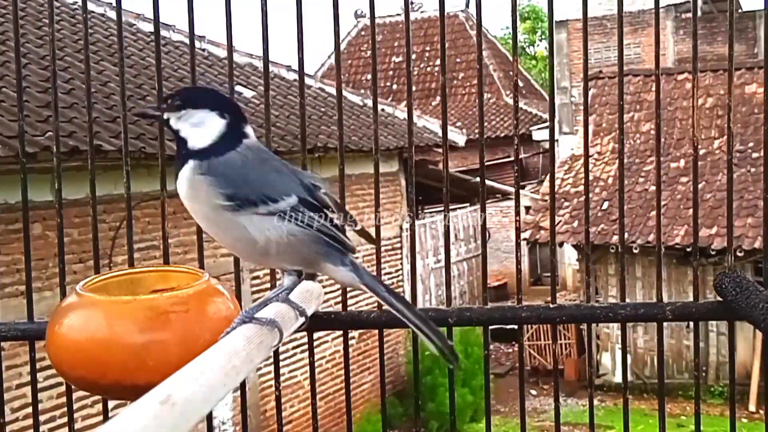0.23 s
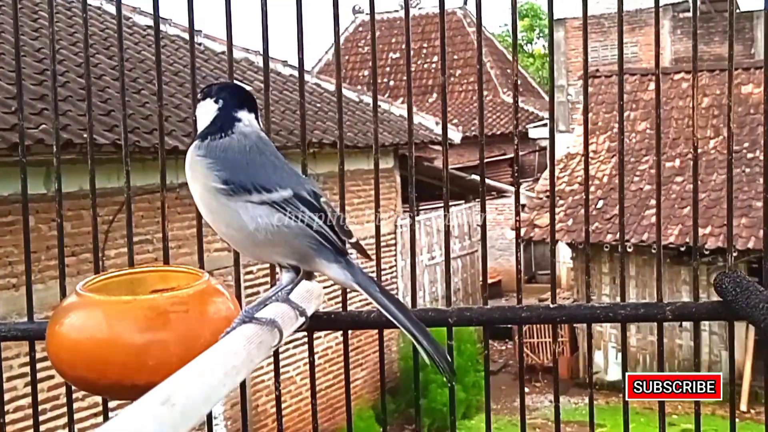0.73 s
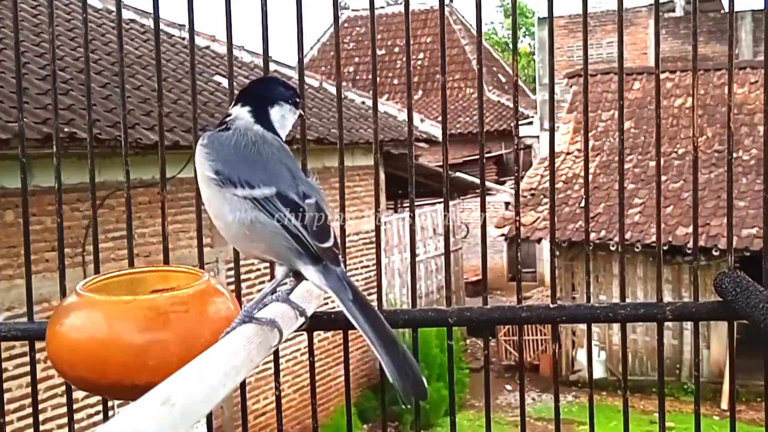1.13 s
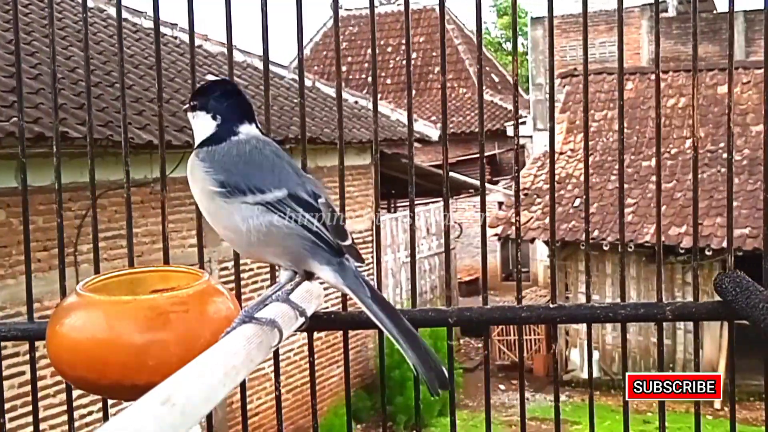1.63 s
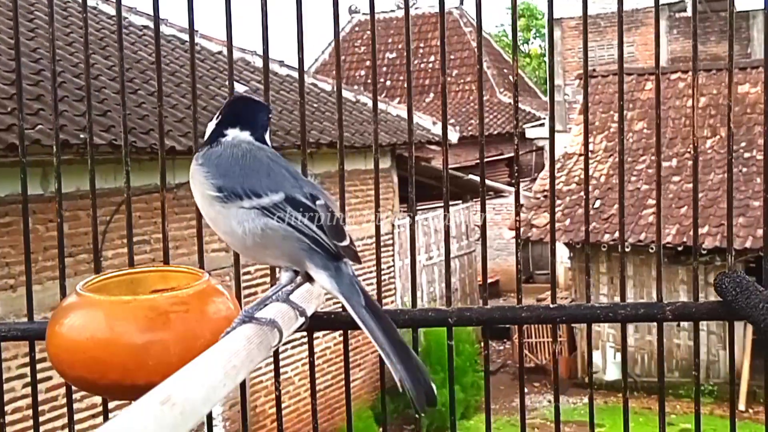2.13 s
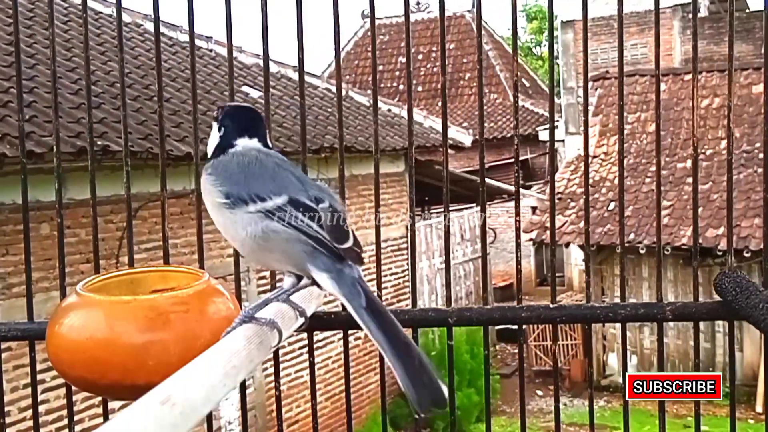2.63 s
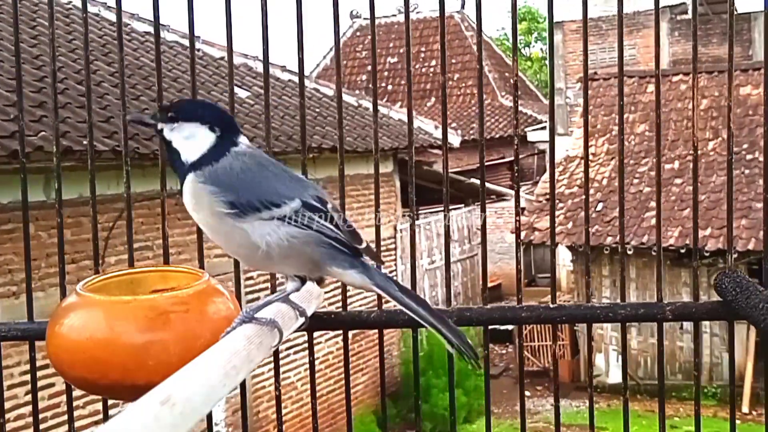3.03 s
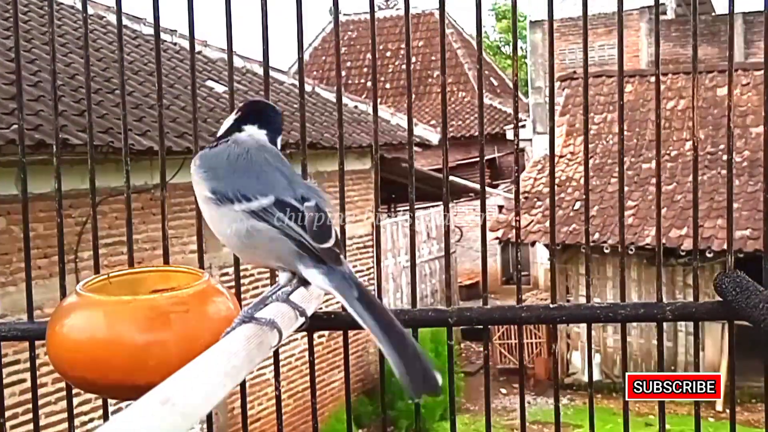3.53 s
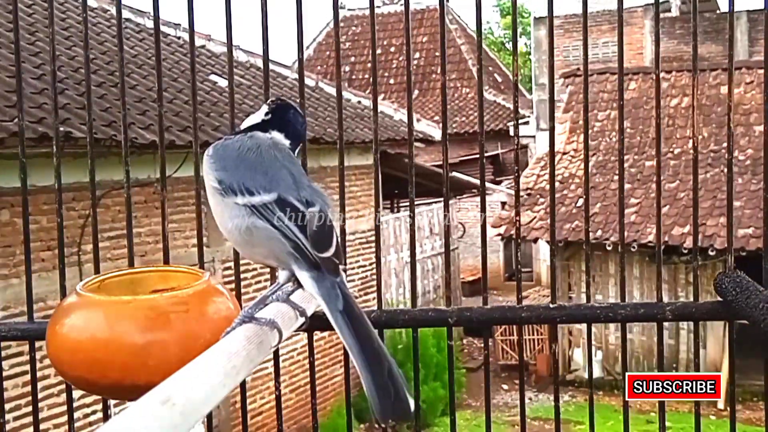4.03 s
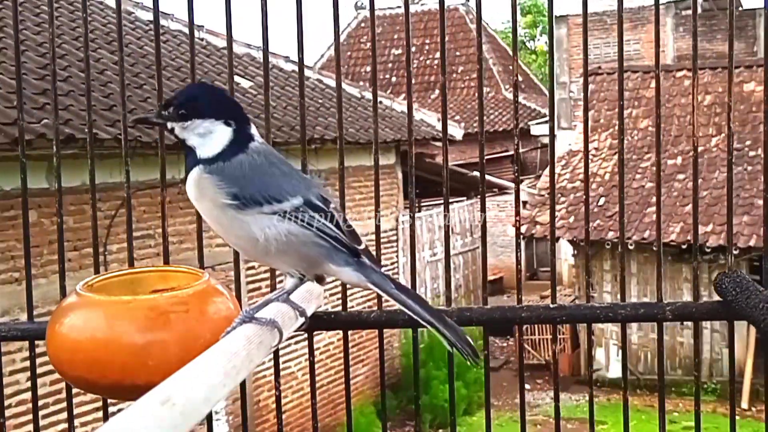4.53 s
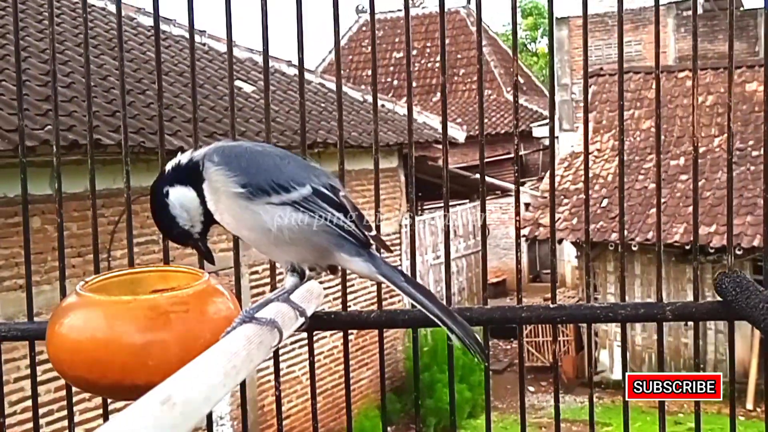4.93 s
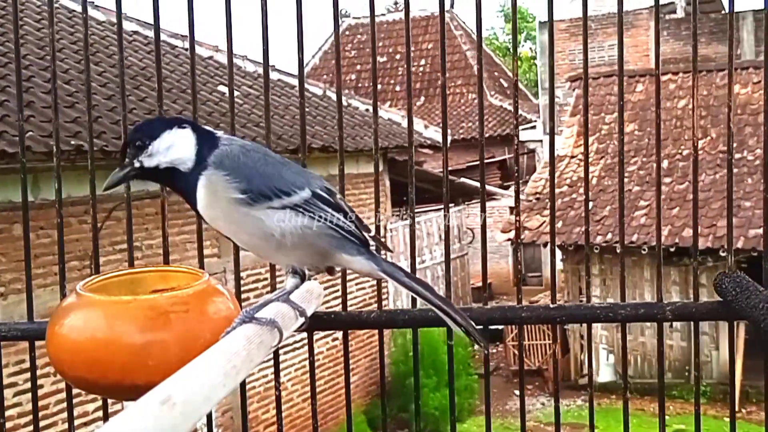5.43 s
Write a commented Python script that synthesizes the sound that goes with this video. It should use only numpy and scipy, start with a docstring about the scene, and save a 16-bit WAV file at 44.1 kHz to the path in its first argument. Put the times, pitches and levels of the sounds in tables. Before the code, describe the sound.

A small engine chugs with a quick, hollow beat and recedes among houses. Close up and much louder, a small bird whistles a bright, rising three-note pattern five times in a row, with a slight echo from the yard walls. The song ends, leaving a soft outdoor background with far-off chirps, a barely audible insect and some dull knocks and light rubbing.

```python
"""A caged tit, close up, sings five quick phrases of three arched whistles: low, middle, high.
Each is a gliding tone with weak overtones; the cage bars scatter it and the yard walls answer.
Before the song, a one-cylinder engine putters, each puff ringing its pipe, and fades among the houses.
Far birds and an insect call faintly over the village hush, with a few soft bumps and scuffs."""
import sys
import numpy as np
from scipy import signal
from scipy.fft import rfft, irfft, next_fast_len
from scipy.io import wavfile
from scipy.ndimage import uniform_filter1d, minimum_filter1d, map_coordinates

SR = 44100
rng = np.random.default_rng(int(sys.argv[2]) if len(sys.argv) > 2 else 0)


def wav_out(sig):
    """Save sig, one row per channel (or a flat mono array), as 16-bit PCM at SR to the path in sys.argv[1]."""
    wavfile.write(sys.argv[1], SR, np.round(np.clip(np.atleast_2d(sig).T, -1, 1) * 32767).astype(np.int16))


N = 250488
TIME = np.arange(N) / SR


def amp(db):
    """Decibels to gain."""
    return 10 ** (np.asarray(db) / 20)


def unit(x):
    """Scale to rms 1."""
    return x / np.sqrt(np.mean(x ** 2) + 1e-20)


def along(points, hz):
    """Read (Hz, value) points on a log axis."""
    f, v = np.transpose(points)
    return np.interp(np.log(hz + 1), np.log(f + 1), v)


def curve(rows):
    """Read (seconds, value) points at every sample."""
    return np.interp(TIME, *np.transpose(rows))


def wobble(rate):
    """A smooth random curve with rate knots a second."""
    return map_coordinates(rng.standard_normal(int(N * rate / SR) + 4), [TIME * rate])


def filtered(x, response):
    """Apply a complex frequency response."""
    m = next_fast_len(N + SR // 2)
    return irfft(rfft(x, m) * response(np.fft.rfftfreq(m, 1 / SR)), m)[:N]


def resonance(f, hz, width):
    """Causal band-pass with a peak gain of 1."""
    return 1j * f * width / (hz * hz - f * f + 1j * f * width)


def noise(spectrum):
    """Coloured noise of rms 1."""
    return unit(filtered(rng.standard_normal(N), lambda f: amp(along(spectrum, f))))


def band_noise(hz, width):
    """Noise of rms 1 around one frequency."""
    return unit(filtered(rng.standard_normal(N), lambda f: resonance(f, hz, width) ** 2))


def gate(start, end, edge):
    """1 between start and end, with smooth edges."""
    return np.sin(np.pi / 2 * np.clip(np.minimum(TIME - start, end - TIME) / edge + .5, 0, 1)) ** 2


# Colour of the background bed. Each row: frequency in Hz, relative level in dB.
HUSH_SPECTRUM = [(18, -43.5), (30, -12.5), (98, -1.5), (226, -8), (294, -10.5), (353, 5.5), (424, -12.5),
                 (566, -15.5), (645, -10.5), (2950, -20.5), (3360, -21), (4490, -28), (7010, -27),
                 (11800, -46), (15800, -37.5)]

def village_hush(patchy_db=4.0, level_db=-58):
    """The hush of the village swells and ebbs in small patches of time and frequency."""
    spectrogram = signal.stft(noise(HUSH_SPECTRUM), nperseg=1024)[2]
    patches = uniform_filter1d(rng.standard_normal(spectrogram.shape), size=3, axis=0)
    patches = unit(uniform_filter1d(patches, size=8, axis=1))
    hush = signal.istft(spectrogram * amp(patchy_db * patches), nperseg=1024)[1][:N]
    return amp(level_db) * unit(hush)


# The yard's reverb. Each row: frequency in Hz, seconds to die away by 60 dB.
YARD_DECAY = [(300, 0.53), (4000, 0.22), (6000, 0.41), (8000, 0.29), (14000, 0.15)]

def yard(x, build_s=0.018):
    """The walls answer with a diffuse tail of unit energy."""
    hz, t, spectrogram = signal.stft(rng.standard_normal(SR // 2), SR, nperseg=256)
    decay = amp(-60 * t / along(YARD_DECAY, hz)[:, None])
    tail = signal.istft(spectrogram * decay, SR, nperseg=256)[1]
    tail *= 1 - np.exp(-(np.arange(len(tail)) / SR / build_s) ** 2)
    return signal.fftconvolve(x, tail / np.linalg.norm(tail))[:N]


# Fade of the engine's wash as it leaves. Each row: time in seconds, level in dB before the layer trims.
WASH_FADE = [(0.0, -41.5), (0.57, -43.5), (0.74, -41), (1.47, -49), (4.71, -60.5), (5.31, -63.5),
             (5.68, -64.5)]
# Colours of its low and high layers. Each row: frequency in Hz, relative level in dB.
DRONE_SPECTRUM = [(29, -29), (50, -13), (123, -11), (161, -3), (205, -3.5), (243, 0), (285, -9.5), (358, 4),
                  (420, -13.5), (486, -2.5), (555, -13), (625, -10), (705, -19), (774, -10.5),
                  (1200, -35.5), (1560, -56), (2640, -120)]
RATTLE_SPECTRUM = [(590, -25), (1000, -7), (1110, 0), (1920, -9), (2140, -3), (2310, -9), (3400, -9.5),
                   (3950, -16), (5630, -15.5), (6270, -11.5), (8650, -30), (13000, -44.5)]

def engine_wash(drone_db=-1.5, rattle_db=-17.5, rattle_fade=1.35):
    """Drone and rattle blur among the houses; distance takes the treble first."""
    wash_db = curve(WASH_FADE)
    peak_db = wash_db.max()
    drone = amp(wash_db + drone_db) * noise(DRONE_SPECTRUM)
    rattle = amp(peak_db + rattle_db + rattle_fade * (wash_db - peak_db)) * noise(RATTLE_SPECTRUM)
    return amp(3.6 * wobble(23)) * (drone + rattle)


# Two even runs of firing, a stumble between them. Each row: start and end in seconds.
FIRING_RUNS = [(.014, 1.0), (1.065, 1.62)]
# Strength of the exhaust. Each row: time in seconds, relative thump and bark levels in dB.
EXHAUST_LEVELS = [(0, -32, -37.5), (.42, -28, -43), (.53, -25.5, -40), (.63, -35.5, -41), (.74, -31, -35.5),
                  (1.0, -37.5, -36), (1.17, -36, -41), (1.28, -50, -52), (1.6, -51, -58)]
# Ring of the exhaust pipe. Each row: frequency in Hz, width in Hz, relative level in dB.
PIPE_MODES = [(165.6, 34, -14.5), (232.5, 4.6, -1), (367.5, 87, 5.5), (533, 50, 4), (720, 34, -48)]
# Colours of exhaust bark and valve tick. Each row: frequency in Hz, relative level in dB.
BARK_SPECTRUM = [(400, -16.5), (700, 1.5), (1150, -5.5), (1600, -10), (2150, -16.5), (3200, -22.5),
                 (4300, -31), (6000, -28), (9000, -46), (14000, -60)]
TICK_SPECTRUM = [(3500, -6.5), (5400, -17), (6400, 2.5), (7400, -12.5), (8500, -17), (11000, -25),
                 (15000, -32)]

def engine_beats(firing_hz=9.72, slap_s=0.0081, slap_loss_db=-0.7, bark_loss_db=-2, pop_s=0.0025,
                 tick_s=0.015, thump_db=37, bark_db=1.0, tick_db=-24, echo_db=-11, wet_db=-13):
    """Each puff of gas rings the pipe and slaps between close walls; the valves clatter just after."""
    puffs, bark_power, ticks = np.zeros((3, N))
    t = np.arange(SR // 10) / SR
    pop = np.exp(-t / pop_s) * (1 - np.exp(-t / 0.001)) ** 2
    tick = t / tick_s * np.exp(1 - t / tick_s)
    firings = np.concatenate([np.arange(start, end, 1 / firing_hz) for start, end in FIRING_RUNS])
    when, *levels = np.transpose(EXHAUST_LEVELS)
    for start in firings:
        puff_db, pop_db = (np.interp(start, when, level) for level in levels)
        for bounce, (late, louder) in enumerate(rng.standard_normal(size=(4, 2))):
            at = round((start + bounce * slap_s + min(bounce, 1) * 0.00058 * late) * SR)
            loss_db = bounce * slap_loss_db + 0.58 * louder
            puffs[at] += amp(puff_db + loss_db + thump_db)
            # the bark fades faster, so each bounce is duller
            bark_power[at:at + len(t)] += amp(pop_db + loss_db + bounce * bark_loss_db) ** 2 * pop
        ticks[round(start * SR):][:len(t)] += amp((pop_db + puff_db) / 2) * tick
    modes = lambda f: sum((-1) ** k * amp(db) * resonance(f, hz, width)
                          for k, (hz, width, db) in enumerate(PIPE_MODES))
    thumps = filtered(puffs, lambda f: modes(f) / (1 + 1j * f / 1100) ** 2)
    bark = amp(bark_db) * np.sqrt(bark_power) * noise(BARK_SPECTRUM)
    valves = amp(tick_db) * ticks * noise(TICK_SPECTRUM)
    beats = thumps + bark + valves
    echo = amp(echo_db) * np.interp(TIME - .06, TIME, thumps)  # off a farther house
    return beats + echo + amp(wet_db) * yard(beats)


# Soft bumps. Each row: start in seconds, envelope peak in dB, pitch in Hz.
BUMP_HITS = [(0.344, -36.5, 90), (.431, -42, 85), (.546, -32, 141), (0.569, -36, 85), (4.222, -43.5, 85),
             (4.558, -47, 118), (4.67, -44.5, 79.4), (4.823, -36.5, 92)]

def bumps(rise_s=0.0091):
    """Dull knocks, each a low tone that dies within a few cycles."""
    out = np.zeros(N)
    for start, db, hz in BUMP_HITS:
        t = np.maximum(TIME - start, 0)
        envelope = (t / rise_s) ** 2 * np.exp(2 - 2 * t / rise_s)
        out += amp(db) * envelope * np.sin(2 * np.pi * hz * t)
    return out


# Insect trills. Each row: start and end in seconds, level in dB.
INSECT_TRILLS = [(.66, 1.07, -76), (4.283, 4.667, -76), (5.27, 5.681, -78.5)]

def insect(buzz_hz=8100, width_hz=450, whine_hz=13680, drift_hz=50, whine_db=-83.5, swell_db=2.5):
    """A narrow buzz in short trills, and a thin whine that comes and goes above it."""
    trills = sum(amp(db) * gate(start, end, .03) for start, end, db in INSECT_TRILLS)
    buzz = trills * band_noise(buzz_hz, width_hz)
    pitch = whine_hz + drift_hz * (wobble(2) + wobble(300))
    swell = amp(whine_db + swell_db * (wobble(3) + wobble(12)))
    return buzz + swell * np.sin(2 * np.pi * np.cumsum(pitch) / SR)


# Distant calls. Each row: start and length in seconds, first and last pitch in Hz, relative level in dB.
FAR_BIRD_CALLS = [(1.355, 0.075, 2700, 2660, -68), (1.551, 0.087, 2550, 2380, -63.5),
                  (3.903, 0.052, 3500, 3380, -67), (4.248, 0.065, 3306, 3270, -65.5),
                  (4.458, 0.067, 3448, 3320, -67.5), (5.35, .12, 3380, 3420, -67),
                  (5.41, 0.095, 1750, 2157, -57), (5.642, 0.057, 1984, 2125, -56)]

def far_birds(waver=0.018, direct_db=-3, wet_db=-6):
    """Faint gliding calls, blurred by distance."""
    calls = np.zeros(N)
    unsteady = 1 + waver * wobble(400)
    for start, length, first_hz, last_hz, db in FAR_BIRD_CALLS:
        pitch = np.interp(TIME, [start, start + length], [first_hz, last_hz]) * unsteady
        calls += amp(db) * gate(start, start + length, .025) * np.sin(2 * np.pi * np.cumsum(pitch) / SR)
    return amp(direct_db) * calls + amp(wet_db) * yard(calls)


def cage(x, decay_s=0.0044):
    """The bars scatter a short, dense flurry of reflections, of unit energy."""
    t = np.arange(SR // 16) / SR
    flurry = rng.standard_normal(len(t)) * t / decay_s * np.exp(-t / decay_s)
    return signal.fftconvolve(x, flurry / np.linalg.norm(flurry))[:N]


# Breath through the open beak, then the overtones' EQ. Each row: frequency in Hz, relative level in dB.
BREATH_SPECTRUM = [(6000, -39), (10000, -2.5), (12000, 0), (14000, -6.5), (15500, -14)]
BEAK_EQ = [(7000, 1.5), (8200, -3.5), (9200, -6.5), (10000, 0.5), (11500, -11), (12800, -5), (13700, -2.5),
           (14700, 6), (15300, -2), (15560, -15.5)]
# The beak beams the overtones at or past the listener. Each row: time in seconds, gain in dB.
BEAK_AIM = [(1.8, 7.5), (2.15, 8.5), (2.5, 1.5), (2.9, -3.5), (3.4, -3.5), (3.7, -4.5), (4.1, -6)]
# Notches where near reflections cancel. Each row: frequency in Hz, width in Hz, depth in dB.
REFLECTION_NOTCHES = [(3890, 270, -5.5), (4326, 180, -16.5), (5460, 160, -6.5), (5910, 250, -15.5),
                      (7700, 260, -2.5)]

def whistles(arch, notes, level_db, second_db, step_db, rasp_db, rasp_hz, wet_db, hiss_db,
             edge_s=.004, jitter=.0015, shimmer_db=1.8, drive=.2, overtone_rasp=0.084, cage_db=-13):
    """A pure tone rides up and down its arch, with weak overtones and a trace of rasp and hiss."""
    place, arch_hz, arch_db = np.transpose(arch)
    pitch, envelope = np.full(N, arch_hz[0]), np.zeros(N)
    for start, length, ratio, note_db in notes:
        end = start + length
        on = (TIME > start - 2 * edge_s) & (TIME < end + 2 * edge_s)
        progress = (TIME[on] - start) / length
        pitch[on] = ratio * np.interp(progress, place, arch_hz)
        contour_db = np.interp(progress, place, arch_db) + note_db + level_db
        envelope[on] = amp(contour_db) * gate(start, end, edge_s)[on]
    pitch = uniform_filter1d(pitch, size=90)  # muscles round the corners of the glide
    phase = 2 * np.pi * np.cumsum(pitch * (1 + jitter * wobble(640))) / SR
    envelope *= amp(shimmer_db * wobble(250))
    tone = envelope * np.sin(phase)
    sidebands = amp(rasp_db) * wobble(2 * rasp_hz) * tone
    # the rasp lies mostly above the note's lowest pitch
    rasp = filtered(sidebands, lambda f: 1 / (1 + (arch_hz[0] / (f + 1)) ** 10))
    # overtones grow faster than the tone itself, and are rougher
    strain = envelope * (envelope / envelope.max()) ** drive
    roughness = amp(1.9 * wobble(150)) * (1 + overtone_rasp * wobble(2 * rasp_hz))
    harmonics = sum(amp(second_db + (k - 2) * step_db) * np.sin(k * phase) * (k * pitch < SR / 2)
                    for k in range(2, 5))
    breath = amp(hiss_db) * noise(BREATH_SPECTRUM)
    overtones = filtered(strain * roughness * (harmonics + breath), lambda f: amp(along(BEAK_EQ, f)))
    overtones += amp(cage_db) * cage(overtones)  # thin bars scatter the shortest waves most
    # the level dips each time the pitch sweeps through a notch
    notches = lambda f: np.prod([1 - (1 - amp(db)) * resonance(f, hz, width)
                                 for hz, width, db in REFLECTION_NOTCHES], axis=0)
    direct = filtered(tone + rasp + amp(curve(BEAK_AIM)) * overtones, notches)
    return direct + amp(wet_db) * yard(tone + amp(0.5) * overtones)


# Each whistle's arch. Each row: place in the note from 0 to 1, base pitch in Hz, relative level in dB.
LOW_GLIDE = [(0, 3340, -34), (.16, 3520, -25), (.345, 3740, -16), (.47, 4080, -1), (.628, 4650, -1),
             (.68, 4440, -4), (.81, 4040, -2), (.92, 3800, -12), (1, 3700, -8)]
MIDDLE_GLIDE = [(0, 4660, -34), (.12, 4760, -12), (.275, 4930, 0), (.43, 5330, -2), (.56, 6330, -4),
                (.645, 6390, -3), (.727, 5380, -3), (.805, 4950, 0), (.92, 4790, -1), (1, 5060, -10)]
HIGH_GLIDE = [(0, 6600, -17), (.172, 7170, -4), (.258, 7770, 0), (.344, 8370, -6), (.43, 8570, -12),
              (.573, 8350, -8), (.743, 7860, -2), (.93, 7260, -2), (1, 6880, -12)]
# Its cues, one a phrase. Each row: start and length in seconds, pitch ratio, relative level in dB.
LOW_CUES = [(1.805, 0.064, 1, -15), (2.253, 0.066, 0.99, -10), (2.729, 0.06, 1, -8.5),
            (3.203, .064, 1.002, -7.5), (3.662, 0.067, 0.99, -7)]
MIDDLE_CUES = [(1.94, .088, 1.032, -7.5), (2.387, 0.096, 1.0114, -7), (2.866, 0.097, 1, -5.5),
               (3.335, 0.099, 0.999, -4.5), (3.798, 0.1, 1, -5)]
HIGH_CUES = [(2.101, .086, 1.015, -13.5), (2.563, 0.083, 1, -9.5), (3.045, 0.09, 1.005, -8.5),
             (3.505, 0.093, 1.004, -15.5), (3.974, 0.091, 0.99, -17)]

def tit():
    """Five phrases, each stepping up through three whistles; the top one is the raspiest."""
    low = whistles(LOW_GLIDE, LOW_CUES, level_db=-0.5, second_db=-27.5, step_db=-7.0,
                   rasp_db=-36.5, rasp_hz=2382, wet_db=-22.0, hiss_db=-60)
    middle = whistles(MIDDLE_GLIDE, MIDDLE_CUES, level_db=-1.0, second_db=-31.0, step_db=-3.0,
                      rasp_db=-37.0, rasp_hz=1316, wet_db=-24.5, hiss_db=-51)
    high = whistles(HIGH_GLIDE, HIGH_CUES, level_db=1.0, second_db=-26.75, step_db=-4.5,
                    rasp_db=-24.0, rasp_hz=690, wet_db=-23.0, hiss_db=-64.5)
    return low + middle + high


# Faint scuffs. Each row: start and length in seconds, centre in Hz, level in dB.
SCUFF_CUES = [(4.379, 0.115, 775, -61.5), (4.95, 0.037, 2087, -64), (4.957, .033, 6500, -71.5),
              (5.129, 0.042, 770, -59), (5.206, 0.056, 1200, -61.5)]

def scuffs(spread=0.5):
    """Short, soft rubbing sounds somewhere in the yard."""
    return sum(amp(db) * gate(start, start + length, 0.026) * band_noise(hz, spread * hz)
               for start, length, hz, db in SCUFF_CUES)


def scene():
    """Everything in the yard, mixed to mono."""
    engine = engine_wash() + engine_beats()
    return (village_hush() + engine + bumps() + insect() + far_birds() + tit() + scuffs())[None]


def record(dry):
    """A fast limiter holds down the loudest whistles; a brick-wall low-pass trims the top."""
    ceiling, top_hz = .56, 15560
    needed = ceiling / np.maximum(np.abs(dry[0]), ceiling)
    gain = uniform_filter1d(minimum_filter1d(needed, size=220), size=220)
    return filtered(gain * dry[0], lambda f: f < top_hz)[None]


dry = scene()
out = record(dry)
wav_out(out)
```